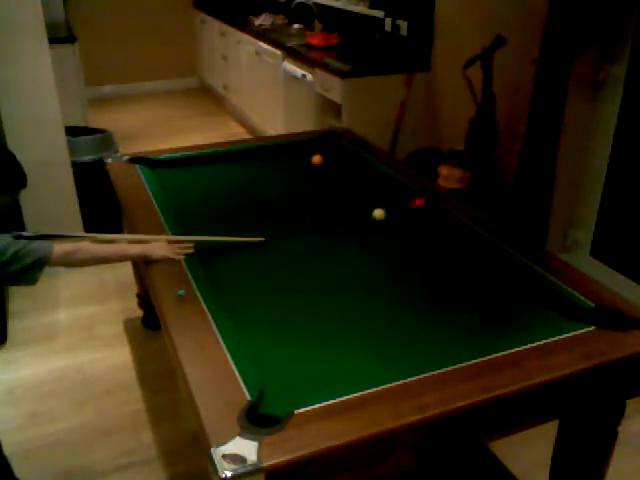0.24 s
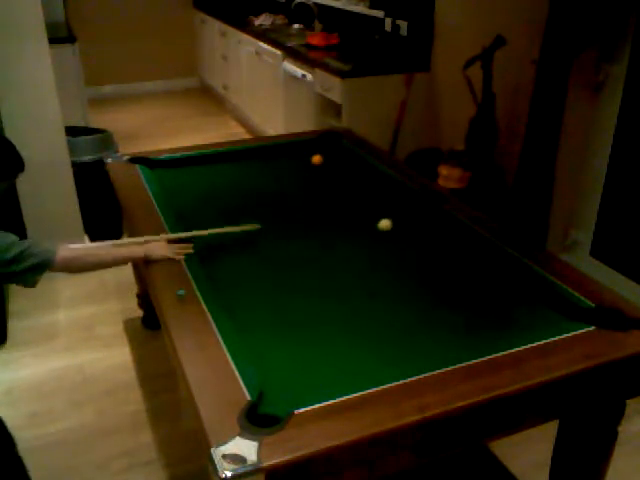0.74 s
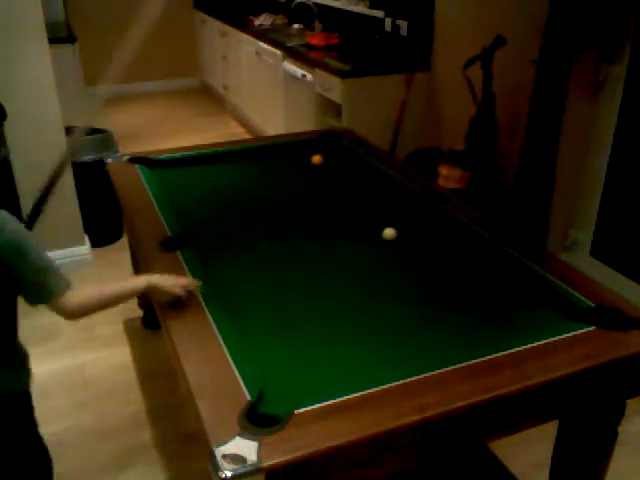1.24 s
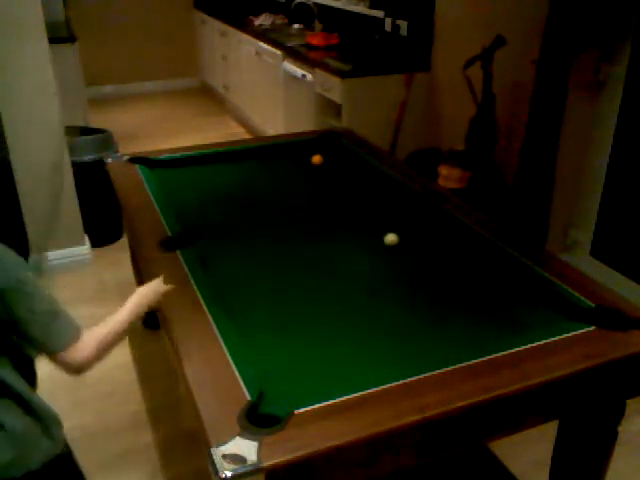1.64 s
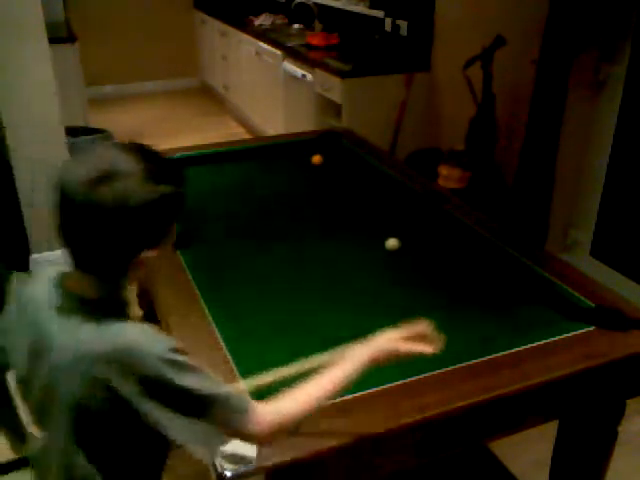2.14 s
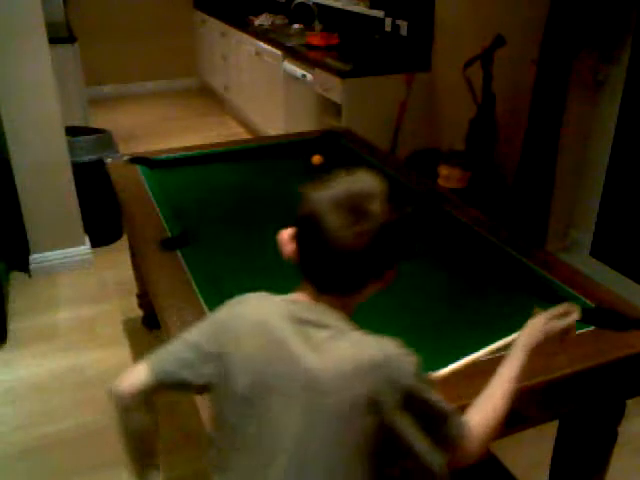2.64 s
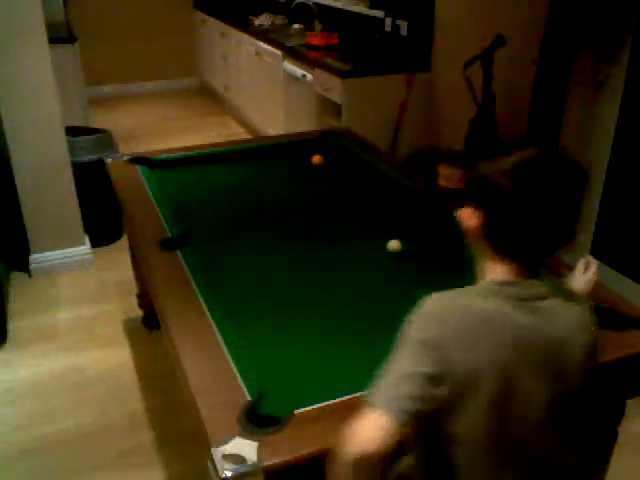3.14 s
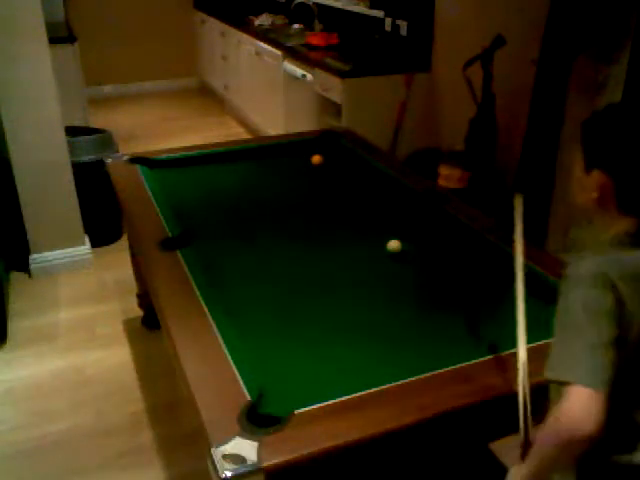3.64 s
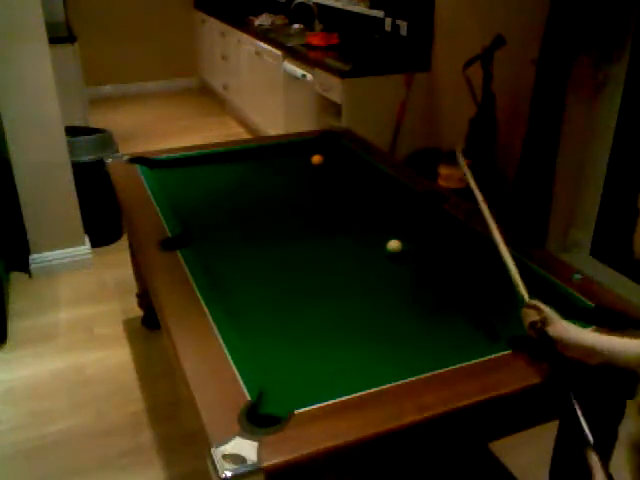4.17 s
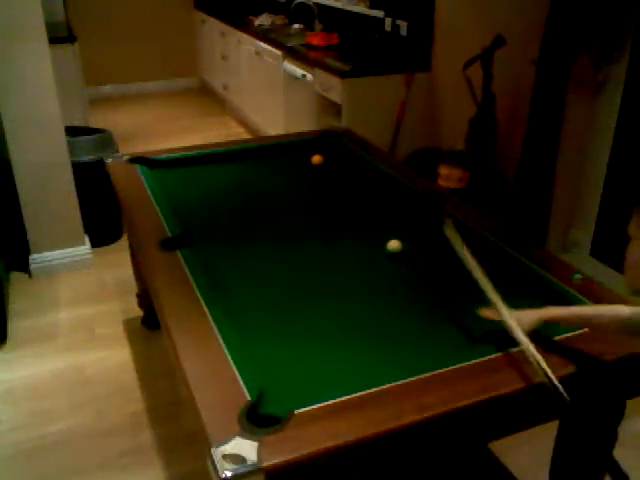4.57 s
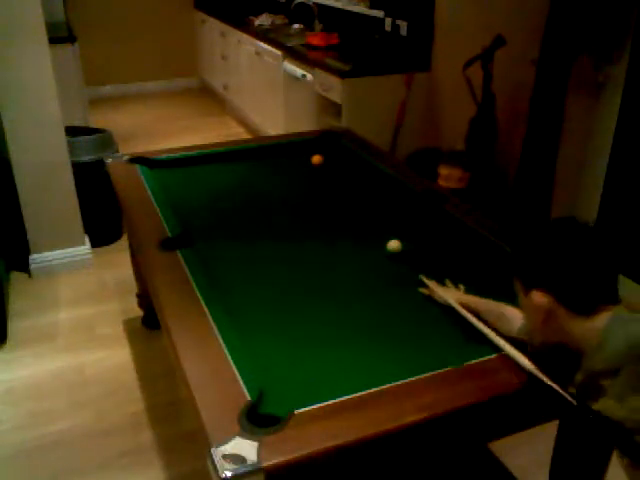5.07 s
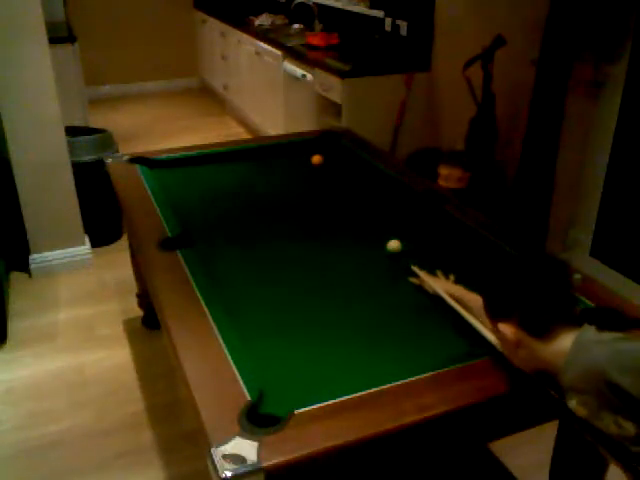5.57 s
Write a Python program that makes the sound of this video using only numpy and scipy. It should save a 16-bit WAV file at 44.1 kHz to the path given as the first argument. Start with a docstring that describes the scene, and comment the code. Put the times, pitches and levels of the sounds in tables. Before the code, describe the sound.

A quick pool shot: woody cue knock, hard click of balls, then the loudest sound, a pocket slam with smaller rattles. The ball rolls inside the table, dropping three times with boxy knocks. Dull footfalls and faint wooden taps trail off into near quiet. Mono pickup a short distance away in a hard-walled room, with low air noise and a faint fan tone.

```python
"""A bare, quiet room with a small pool table: the cue strikes, two balls clack, one slams into a pocket
and rattles down. It rolls through the wooden return channel with three hollow drops, amid footfalls,
hollow knocks and handling of the cue. Blows are short pushes plus decaying body modes, each push through
its own random room response; rolling, rubbing, air and a distant fan are shaped noise."""
import sys
import numpy as np
from scipy import signal
from scipy.fft import rfft, irfft, next_fast_len
from scipy.io import wavfile
from scipy.ndimage import map_coordinates

SR = 44100
rng = np.random.default_rng(int(sys.argv[2]) if len(sys.argv) > 2 else 0)


def wrap_up_sound(samples):
    """Save the sound to the file named by the first command line argument, as 16-bit audio."""
    columns = np.atleast_2d(samples).T
    # keep every value between -1 and 1, then stretch to whole-number steps
    tamed = np.clip(columns, -1, 1)
    steps = np.round(tamed * 32767).astype(np.int16)
    wavfile.write(sys.argv[1], SR, steps)


N = 256220
TIME = np.arange(N) / SR  # s

# Tip strike, then a duller second thump:
# start_s, level_db, bass_db (below 300 Hz), treble_db (above 1500 Hz), ring_db (over the push)
CUE_BLOWS = [(.1036, -23, -7, -0.5, -2.5), (.174, -27.5, 4, -16, -2.5)]
# Push spectrum: freq_hz, density_db (per Hz)
CUE_PUSH_SPECTRUM = [(30, -22), (70, -1), (150, 6.5), (400, -3), (1300, -5.5), (2000, -16), (3800, -23.5),
                     (5000, -37), (7500, -47), (10500, -48.5)]
# Shaft modes before contact colour and scatter: freq_hz, level_db, t60_s
SHAFT_MODES = [(276.4, 8, 0.32), (553, 1.5, 0.47), (750, -7.5, 0.53), (965, -4, 0.32), (1383, -3.5, 0.44),
               (1585, -5.5, 0.2), (2110, -4, 0.65), (2148, -6.5, 0.39), (2850, -16.5, 0.33),
               (3321, -31, 0.28), (3700, -20, 0.48)]


def cue_strike():
    """The tip pushes the ball and rings the shaft; a duller thump follows."""
    return blows(CUE_BLOWS, CUE_PUSH_SPECTRUM, SHAFT_MODES, near_db=6, hall_db=11.5)


# Ball against ball: start_s, level_db, bass_db, treble_db, ring_db
CLACK_BLOWS = [(.2677, -23.3, 0.0082, 0.0054, -9.5)]
# Push spectrum: freq_hz, density_db (per Hz)
CLACK_PUSH_SPECTRUM = [(100, -4.5), (700, -10.5), (1200, -10.5), (1750, 2.5), (2500, -4.5), (3400, -5.5),
                       (4500, -17), (6200, -25.5), (8000, -57), (11000, -76)]
# Brief ball modes before contact colour and scatter: freq_hz, level_db, t60_s
BALL_MODES = [(1662, -6.5, 0.072), (2350, 5.5, 0.036), (2640, 4, 0.042), (3280, 0.5, 0.033)]


def ball_clack():
    """Two hard balls collide and ring briefly."""
    return blows(CLACK_BLOWS, CLACK_PUSH_SPECTRUM, BALL_MODES, near_db=-2.5, hall_db=2.5)


# Pocket knocks: start_s, rim_level_db, rim_treble_db, thump_lag_s, thump_level_db, thump_bass_db
POCKET_KNOCKS = [(.349, -12, -5, .0105, -14, 5.5), (0.4147, -23.5, 9, .023, -18.5, 20),
                 (.518, -28.5, -2.5, 0.038, -31.5, 31), (.634, -35, 4.5, .016, -29, 14.5)]
# Push spectrum: freq_hz, density_db (per Hz)
POCKET_PUSH_SPECTRUM = [(30, -34), (70, -12), (105, -5.5), (150, 0.5), (250, 3.5), (350, 5.5), (480, -2),
                        (700, 0), (1000, -3.5), (1450, -3.5), (1800, -5.5), (2200, -14.5), (3800, -23.5),
                        (6000, -36), (10500, -52.5)]
# Liner modes before contact colour and scatter: freq_hz, level_db, t60_s
LINER_MODES = [(166.3, -6.5, 0.69), (230, -8.5, 0.99), (288, 3, 0.15), (320, 2, 0.33), (592.3, 3.5, 0.36),
               (717, -1, 0.098), (816, -2, 0.44), (883, -4, 0.54), (1086, -2.5, 0.64), (1187, -7.5, 0.88),
               (1345, 4.5, 0.1), (1583, -11, 0.45), (1694, -4.5, 0.63), (1780, -14.5, 0.39)]
RIM_BASS_DB, RIM_RING_DB = -8, -5  # hard rim: little bass
THUMP_TREBLE_DB, THUMP_RING_DB = -19, -6  # soft liner: little treble


def pocket_rattle():
    """Every knock is a hard hit on the rim, then a dull thump into the liner."""
    rows = []
    for start_s, rim_db, rim_treble_db, lag_s, thump_db, thump_bass_db in POCKET_KNOCKS:
        rows.append((start_s, rim_db, RIM_BASS_DB, rim_treble_db, RIM_RING_DB))
        rows.append((start_s + lag_s, thump_db, thump_bass_db, THUMP_TREBLE_DB, THUMP_RING_DB))
    return blows(rows, POCKET_PUSH_SPECTRUM, LINER_MODES, near_db=2.5, hall_db=4)


# Runs between drops: start_s, end_s, start_level_db, growth_db_per_s (speeding up or slowing)
BALL_RUNS = [(.7, 1.136, -55, 11.5), (1.1, 1.4, -52, -6), (1.47, 1.873, -49, 6), (2.13, 2.323, -47, 17),
             (2.4, 3.35, -48.5, -14.5)]
# Rumble spectrum: freq_hz, density_db (per Hz)
RUMBLE_SPECTRUM = [(40, -8.5), (110, 3.5), (170, 0.5), (230, 1), (320, 4), (500, -7.5), (950, -6),
                   (2000, -24), (5000, -82.5), (11000, -76.5)]
# Air and panels of the channel: freq_hz, width_hz, level_db
CHANNEL_PEAKS = [(162, 14, -11), (217, 26, 3), (322, 24, -1.5)]
RUN_FADE_S = .09  # per 20 dB


def rolling_ball():
    """The ball rumbles unevenly along the channel, whose air and panels resonate."""
    rumble = noise(RUMBLE_SPECTRUM) + amp(-4.5) * resonant(CHANNEL_PEAKS)
    levels = []
    for start_s, end_s, start_db, growth_db_per_s in BALL_RUNS:
        rolled_s = np.clip(TIME, start_s, end_s) - start_s
        speed_gain = amp(start_db + growth_db_per_s * rolled_s)
        levels.append(stroke(start_s, end_s, RUN_FADE_S, RUN_FADE_S) * speed_gain)
    return np.max(levels, axis=0) * unit(rumble * amp(1.7 * wobble(14.2)))


# Channel drops: start_s, level_db, bass_db, treble_db, ring_db, landing_lag_s,
# landing_db (over strike), bounce_db (over landing), scattered_db (over direct)
CHANNEL_DROPS = [(1.8561, -19, -5, -0.5, -14.5, .0205, 1.2, -5, 6),
                 (2.3134, -22, -9, 7.5, -5, .0195, -2.6, -25, 10),
                 (3.3533, -19.5, -10.5, -2.5, 2, .015, 3, -13, 9.5)]
# Push spectrum: freq_hz, density_db (per Hz)
RETURN_PUSH_SPECTRUM = [(30, -32.5), (75, -12.5), (110, -17.5), (140, -3), (215, 4), (350, -0.5),
                        (480, -1.5), (750, -4), (1000, -13), (1650, -18), (2400, -32), (4000, -45),
                        (7000, -67.5), (11000, -77.5)]
# Cabinet modes before contact colour and scatter: freq_hz, level_db, t60_s
CABINET_MODES = [(67, -15.5, 0.4), (224, -7, 0.31), (298, 4.5, 0.29), (322.8, 7, 0.24), (352, 1, 0.18),
                 (380.5, -1, 0.35), (428, 0, 0.51), (588, -18, 0.56), (720, -4.5, 0.4), (882, -11.5, 0.56),
                 (1216, -18.5, 0.63)]
LANDING_BASS_DB, LANDING_TREBLE_DB = 5.5, -7  # over the strike
BOUNCE_S, BOUNCE_SHRINK = .046, .95  # first flight, ratio of each flight to the last
BOUNCE_BASS_STEP_DB = 12  # softer contacts last longer


def channel_drops(bounces=2):
    """Each drop strikes an edge, lands bassier and duller, then bounces in ever shorter, bassier hops."""
    out = np.zeros(N)
    bounce_times_s = np.cumsum(BOUNCE_S * BOUNCE_SHRINK ** np.arange(bounces))
    for (start_s, strike_db, bass_db, treble_db, ring_db, lag_s,
         landing_db, bounce_db, scattered_db) in CHANNEL_DROPS:
        landing_s, landed_db = start_s + lag_s, strike_db + landing_db
        dull_db = treble_db + LANDING_TREBLE_DB
        rows = [(start_s, strike_db, bass_db, treble_db, ring_db),
                (landing_s, landed_db, bass_db + LANDING_BASS_DB, dull_db, ring_db)]
        for k, after_s in enumerate(bounce_times_s):
            bounce_bass_db = bass_db + BOUNCE_BASS_STEP_DB * k
            rows.append((landing_s + after_s, landed_db + bounce_db, bounce_bass_db, dull_db, ring_db))
        out += blows(rows, RETURN_PUSH_SPECTRUM, CABINET_MODES,
                     near_db=scattered_db, hall_db=scattered_db + 1.2)
    return out


# Footfalls and hollow knocks: start_s, level_db, weight_db (bass below 300 Hz)
SOFT_CONTACTS = [(2.596, -35.5, 9), (2.66, -39.5, 4), (2.899, -35.5, -12.5), (3.02, -48, -9),
                 (3.184, -55.5, 5), (4.099, -45.5, 15.5), (4.333, -54.5, 60), (4.594, -43.5, -22.5),
                 (4.872, -53, 9), (5.614, -49, 5.5), (5.714, -46, 7.5)]
# Push spectrum: freq_hz, density_db (per Hz)
SOFT_PUSH_SPECTRUM = [(30, -17.5), (80, -5.5), (115, -10), (220, 5.5), (340, -8.5), (450, -8.5),
                      (700, -17.5), (1200, -27.5), (3000, -42), (9000, -53)]
# Board modes before contact colour and scatter: freq_hz, level_db, t60_s
BOARD_MODES = [(224.7, -6.5, 0.95), (331.5, 18, 0.19), (460, -25, 0.84)]
SECOND_LAG_S, SECOND_DB, SOFT_TREBLE_DB = 0.01421, -1.5, -3.5  # second contact relative to first
BOARD_RING_DB, BOARD_DAMPING = -6, 0.59  # damping: dB of ring lost per dB of weight


def footfalls_and_knocks():
    """Paired soft contacts: heavy ones are dull footfalls, light ones ringing hollow knocks."""
    rows = []
    for start_s, first_db, weight_db in SOFT_CONTACTS:
        ring_db = BOARD_RING_DB - BOARD_DAMPING * weight_db
        rows.append((start_s, first_db, weight_db, SOFT_TREBLE_DB, ring_db))
        rows.append((start_s + SECOND_LAG_S, first_db + SECOND_DB, weight_db, SOFT_TREBLE_DB, ring_db))
    return blows(rows, SOFT_PUSH_SPECTRUM, BOARD_MODES, near_db=1.5, hall_db=1, attack_s=0.0032)


# Cue taps: start_s, level_db, treble_db, ring_db
CUE_TAPS = [(2.634, -39, -25, -31), (2.912, -47.5, 2, 4), (3.673, -38, -7, -7), (5.089, -56, -9, 2),
            (5.771, -52.5, -1, 3)]
# Push spectrum: freq_hz, density_db (per Hz)
TAP_PUSH_SPECTRUM = [(60, -21), (300, -6), (500, -0.5), (900, -3), (1700, 1.5), (2400, -9.5), (4500, -24.5),
                     (7000, -44.5), (11000, -37.5)]
# Wood modes before contact colour and scatter: freq_hz, level_db, t60_s
WOOD_MODES = [(944, 2, 0.6), (1097, 5, 0.45), (1105, 3, 0.35), (1627, 7.1, 0.53), (1720, 9, 0.3),
              (2090, 1.5, 0.26)]
TAP_BASS_DB = -1.5


def cue_taps():
    """Light taps of the cue ring its wood."""
    rows = [(start_s, level_db, TAP_BASS_DB, treble_db, ring_db)
            for start_s, level_db, treble_db, ring_db in CUE_TAPS]
    return blows(rows, TAP_PUSH_SPECTRUM, WOOD_MODES, near_db=6, hall_db=13.5)


# Rub spectrum: freq_hz, density_db (per Hz)
RUB_SPECTRUM = [(300, -17.5), (1500, 3.5), (3200, -5.5), (4200, -3.5), (5200, -10.5), (6500, -16),
                (10000, -31)]
SLIDE_S, SLIDE_HOLD_S, SLIDE_DB = 3.305, 0.069, -53.5  # full speed from SLIDE_S
SLIDE_ATTACK_S, SLIDE_RELEASE_S = 0.028, 0.23  # per 20 dB


def cue_slide():
    """The cue slides through the hand: a brief, unevenly loud rub of noise."""
    level = amp(SLIDE_DB) * stroke(SLIDE_S, SLIDE_S + SLIDE_HOLD_S, SLIDE_ATTACK_S, SLIDE_RELEASE_S)
    return level * unit(noise(RUB_SPECTRUM) * amp(2.8 * wobble(290)))


# Air and hiss spectrum: freq_hz, density_db (per Hz)
AIR_SPECTRUM = [(12, -42.5), (20, -3), (59, -10), (92, 1.5), (117, -27), (149, -3), (174, -14.5),
                (320, -10.5), (346, -11), (416, -17), (688, -15.5), (745, -16.5), (1230, -15.5),
                (1900, -21), (2940, -36.5), (11000, -39), (14300, -62.5), (22000, -120)]


def still_air(level_db=-53.5):
    """Steady coloured noise: still air and hiss."""
    return amp(level_db) * noise(AIR_SPECTRUM)


# Distant fan resonances: freq_hz, width_hz, level_db
FAN_PEAKS = [(88, 8.3, -1.5), (352, 6.7, -12.5), (888, 32, -3), (1182, 8, 5.5), (1259, 6.7, 8.5)]


def distant_fan(level_db=-59.0):
    """Noise through narrow resonances."""
    return amp(level_db) * resonant(FAN_PEAKS)


# Echoes off table bed, walls and ceiling: delay_s (before 10 % jitter), level_db
FIRST_ECHOES = [(.0009, 4.5), (.0062, -8.5), (.0086, 2.5), (.0094, -11.5), (0.0174, -13.5)]
# Bare-wall reverberation: freq_hz, t60_s
ROOM_DECAY = [(80, 0.64), (250, 0.5), (500, 0.49), (1500, 0.61), (4000, 0.71), (10000, 0.3)]


def room(near_db, hall_db, near_t60_s=0.075, build_s=0.0028):
    """One second of response: direct sound and echoes, scatter off the furniture, then the bare walls."""
    t = np.arange(SR) / SR
    first = np.zeros(SR)
    first[0] = 1
    for delay_s, level_db in FIRST_ECHOES:
        # every blow comes from its own spot
        first[round(delay_s * SR * rng.uniform(.9, 1.1))] += amp(level_db)
    sparse = rng.standard_normal(SR) ** 3
    near = sparse * amp(-60 * t / near_t60_s) * (1 - np.exp(-t / build_s))
    hz, frame_s, bins = signal.stft(rng.standard_normal(SR), SR, nperseg=256)
    decay = amp(-60 * frame_s / along(ROOM_DECAY, hz)[:, None])
    hall = signal.istft(bins * decay, SR, nperseg=256)[1][:SR]
    hall = hall * (1 - np.exp(-t / (2 * build_s)))
    return unit(first) + amp(near_db) * unit(near) + amp(hall_db) * unit(hall)


def contact(hz, bass_db, treble_db):
    """Heavy, soft contacts favour the bass, hard ones the treble."""
    bass = bass_db / (1 + (hz / 300) ** 3)
    treble = treble_db / (1 + (1500 / (hz + 1)) ** 3)
    return amp(bass + treble)


def blows(rows, push, modes, near_db, hall_db, scatter_db=3.0, attack_s=0.00057):
    """Each blow sends a push into the room and sets modes ringing from rest, neighbours in opposite phase."""
    out, t, hz = np.zeros(N + SR), np.arange(SR) / SR, np.arange(SR // 2 + 1)
    body = amp(along(push, hz))
    for start_s, level_db, bass_db, treble_db, ring_db in rows:
        push_pulse = pulse(body * contact(hz, bass_db, treble_db))
        thud = signal.fftconvolve(push_pulse, room(near_db, hall_db))[:SR]
        ring = np.zeros(SR)
        for k, (freq_hz, mode_db, t60_s) in enumerate(modes):
            decay = amp(mode_db + scatter_db * rng.standard_normal() - 60 * t / t60_s)
            gain = contact(freq_hz, bass_db, treble_db) * (-1) ** k
            ring += decay * gain * np.sin(2 * np.pi * freq_hz * t)
        ring *= 1 - np.exp(-t / attack_s)
        sound = unit(unit(thud) + amp(ring_db) * unit(ring))
        # level_db: the blow's energy taken over a twentieth of a second
        out[round(start_s * SR):][:SR] += amp(level_db) * sound / np.sqrt(20)
    return out[:N]


def pulse(gain):
    """Minimum-phase pulse: the shortest causal one with this spectrum."""
    cepstrum = irfft(np.log(np.maximum(gain, 1e-6)))
    half = len(cepstrum) // 2
    cepstrum[1:half] *= 2
    cepstrum[half + 1:] = 0
    return irfft(np.exp(rfft(cepstrum)))


def stroke(start_s, end_s, attack_s, release_s):
    """Gain: full from start to end, 20 dB down one attack before and one release after."""
    before = np.maximum(start_s - TIME, 0) / attack_s
    after = np.maximum(TIME - end_s, 0) / release_s
    return amp(-20 * (before + after))


def wobble(rate_hz):
    """Smooth random curve with rate_hz knots a second."""
    knots = rng.standard_normal(int(N * rate_hz / SR) + 4)
    return map_coordinates(knots, [TIME * rate_hz])


def noise(spectrum):
    """Coloured noise of rms 1."""
    return unit(filtered(rng.standard_normal(N), lambda hz: amp(along(spectrum, hz))))


def resonant(peaks):
    """Noise of rms 1 through parallel second-order resonances."""
    def response(hz):
        return sum(amp(level_db) * 1j * hz * width_hz / (freq_hz ** 2 - hz ** 2 + 1j * hz * width_hz)
                   for freq_hz, width_hz, level_db in peaks)
    return unit(filtered(rng.standard_normal(N), response))


def filtered(x, response):
    """x times a response of frequency."""
    m = next_fast_len(N + SR // 2)
    return irfft(rfft(x, m) * response(np.fft.rfftfreq(m, 1 / SR)), m)[:N]


def along(points, hz):
    """(Hz, value) points read on a log axis."""
    freq_hz, values = np.transpose(points)
    return np.interp(np.log(hz + 1), np.log(freq_hz + 1), values)


def amp(db):
    """Decibels to gain."""
    return 10 ** (np.asarray(db) / 20)


def unit(x):
    """Scale to rms 1."""
    return x / np.sqrt(np.mean(x ** 2) + 1e-20)


def scene():
    """Everything, heard at one microphone."""
    shot = cue_strike() + ball_clack() + pocket_rattle()
    ball_return = rolling_ball() + channel_drops()
    player = footfalls_and_knocks() + cue_taps() + cue_slide()
    background = still_air() + distant_fan()
    return (shot + ball_return + player + background)[None]


def record(dry, top=1.8, band_limit_hz=10900):
    """Round peaks off towards top, then low-pass steeply at the band limit."""
    rounded = dry[0] / (1 + np.abs(dry[0] / top) ** 6) ** (1 / 6)
    return filtered(rounded, lambda hz: 1 / np.sqrt(1 + (hz / band_limit_hz) ** 320))[None]


dry = scene()
out = record(dry)
wrap_up_sound(out)
```